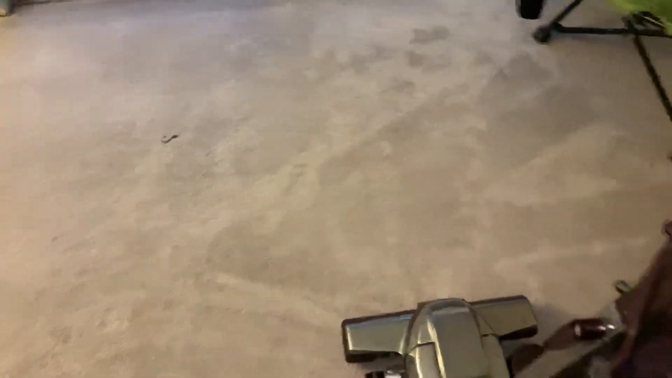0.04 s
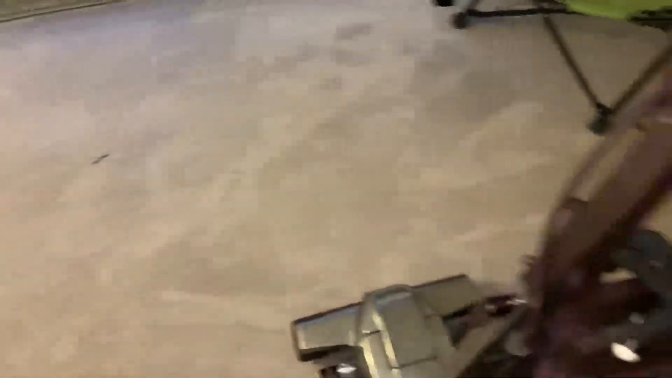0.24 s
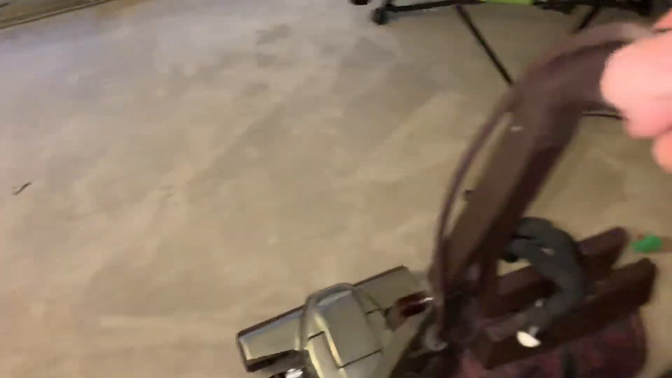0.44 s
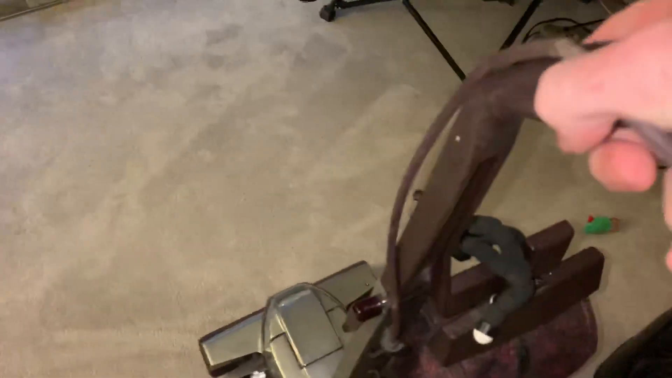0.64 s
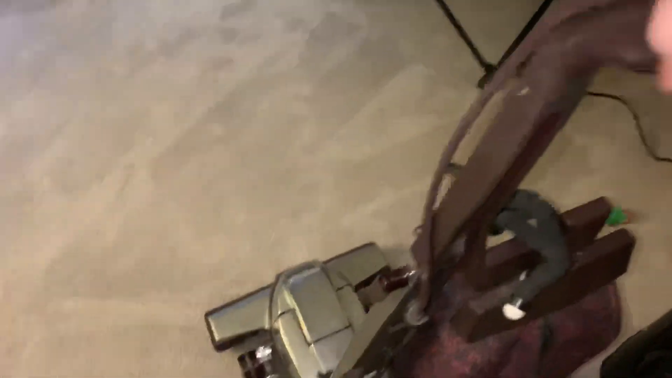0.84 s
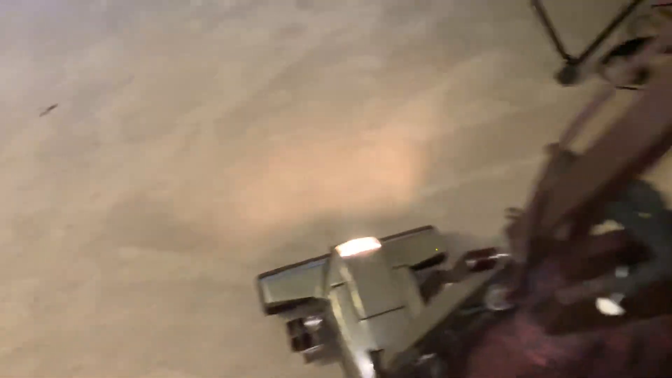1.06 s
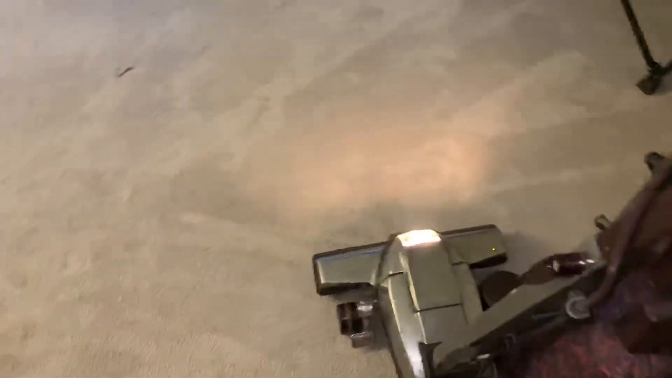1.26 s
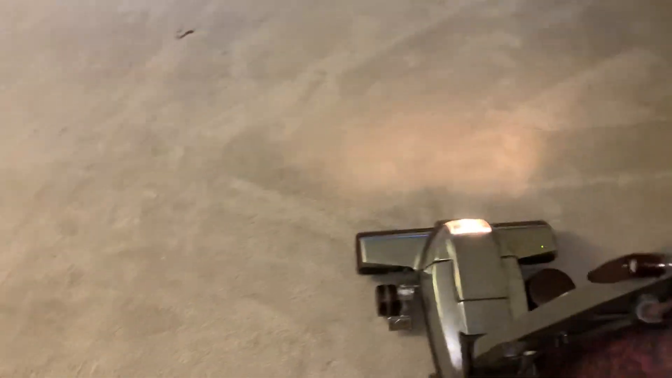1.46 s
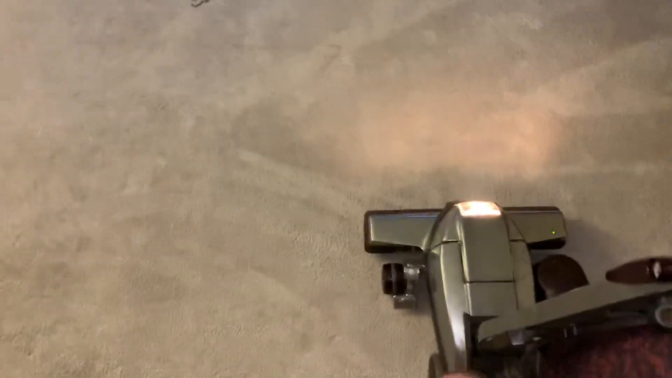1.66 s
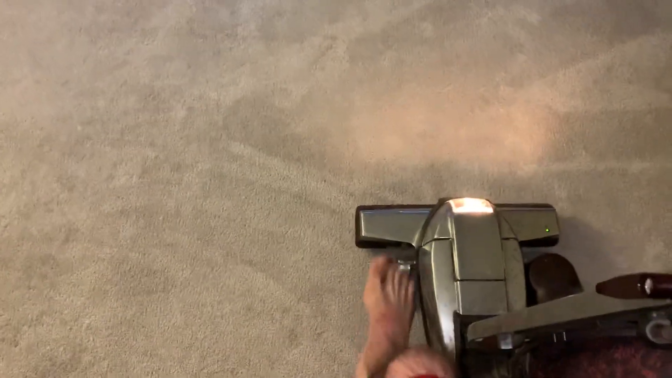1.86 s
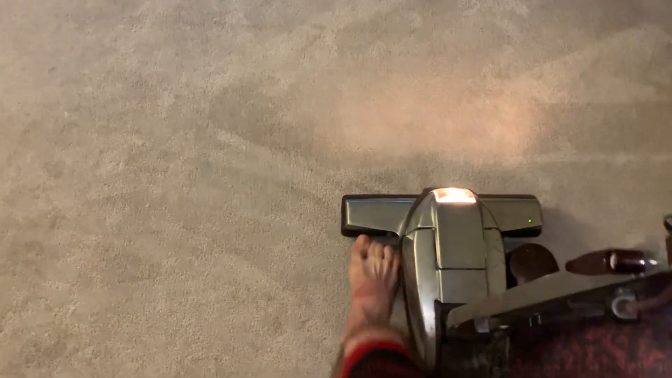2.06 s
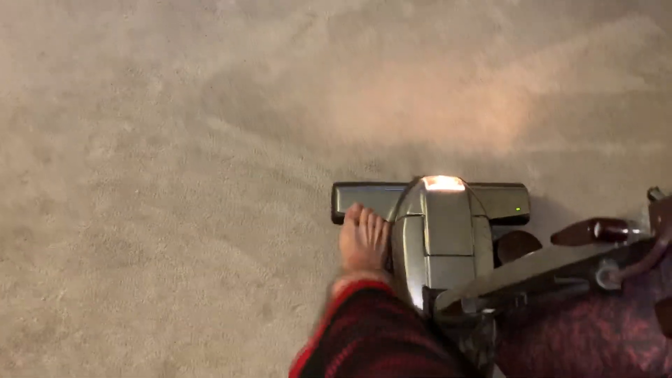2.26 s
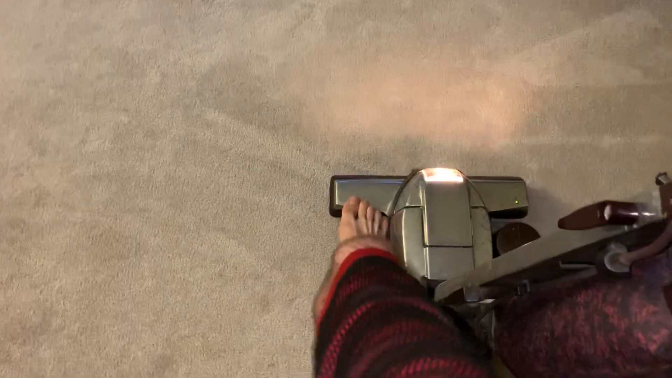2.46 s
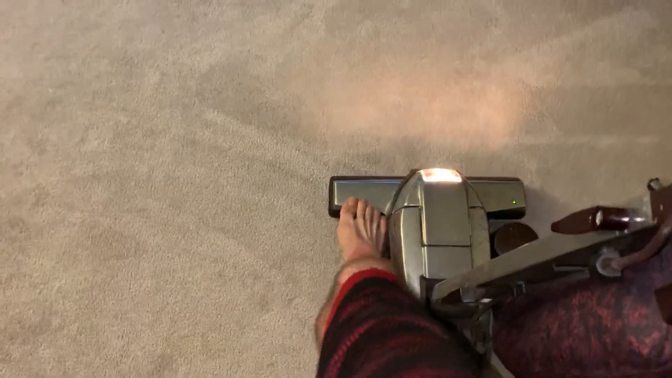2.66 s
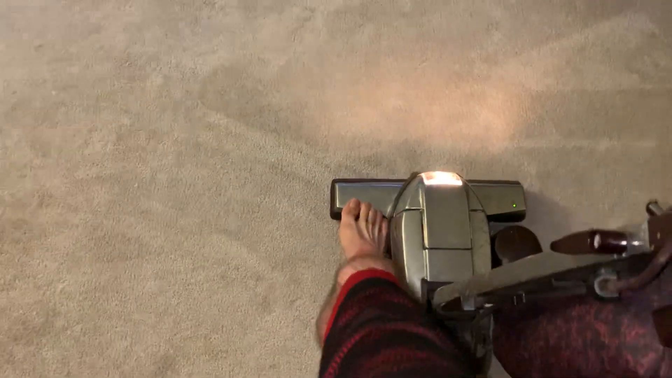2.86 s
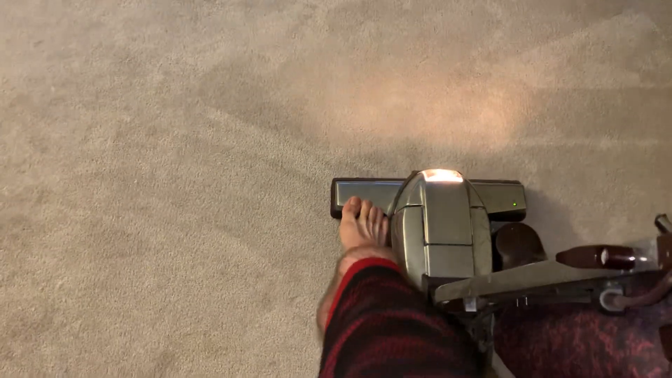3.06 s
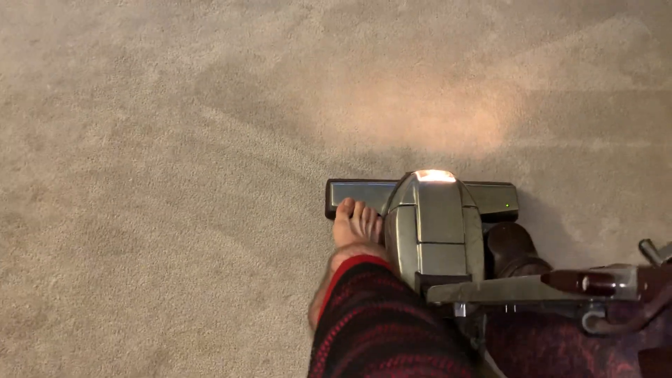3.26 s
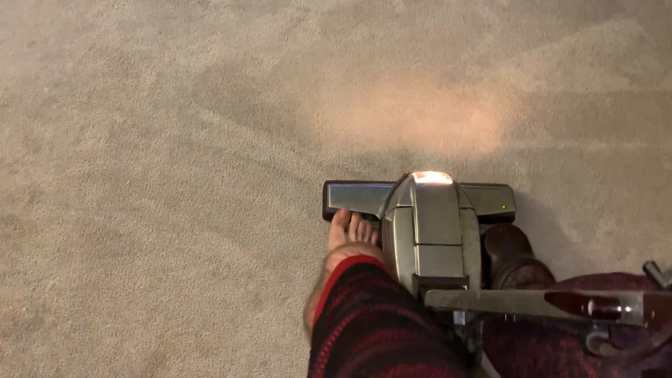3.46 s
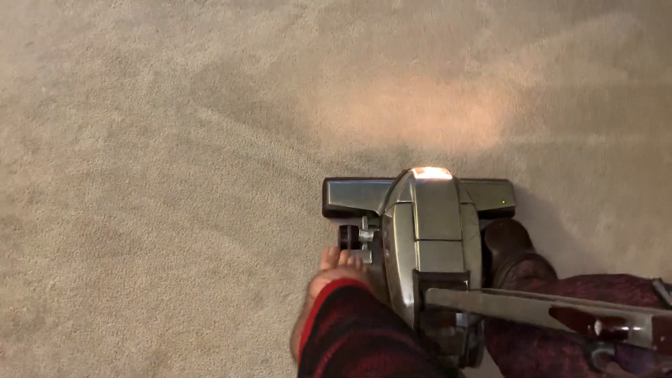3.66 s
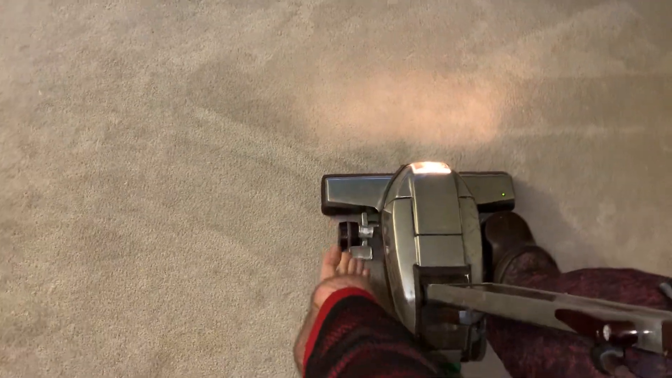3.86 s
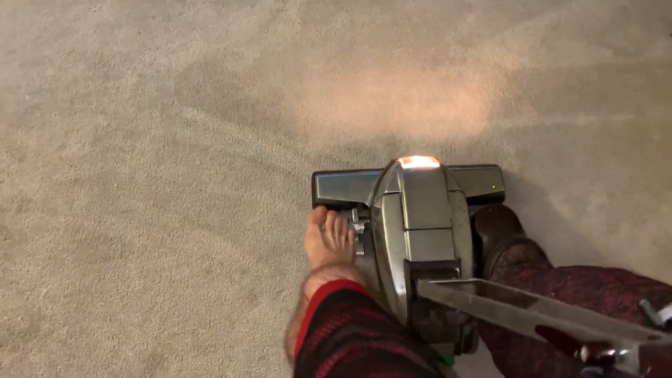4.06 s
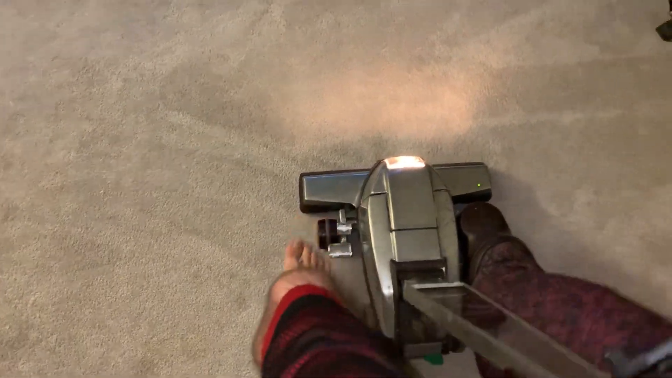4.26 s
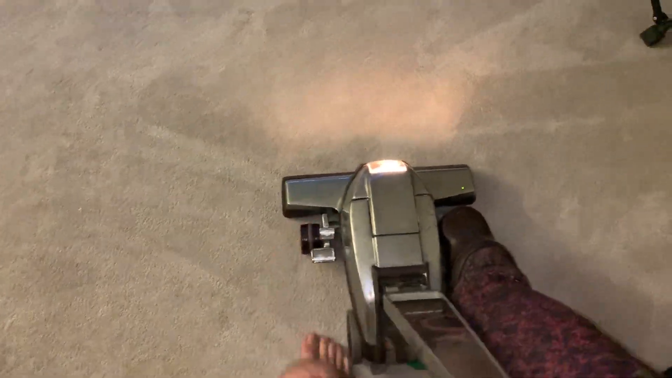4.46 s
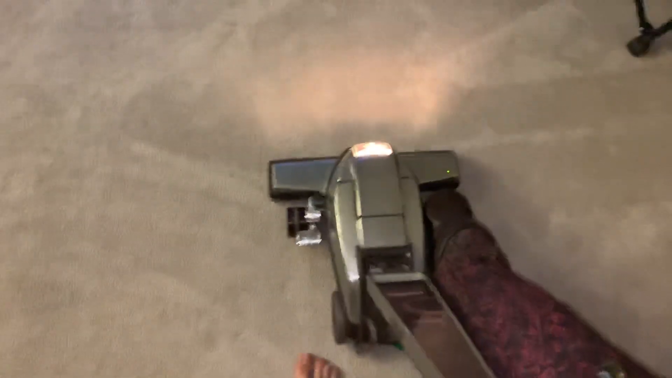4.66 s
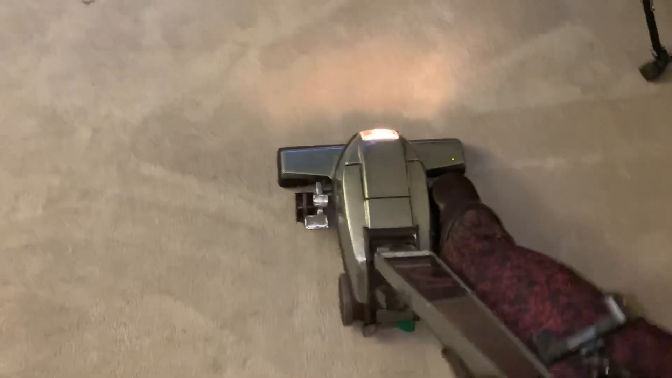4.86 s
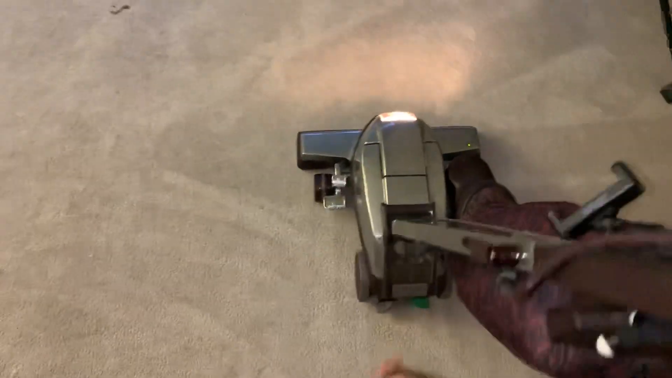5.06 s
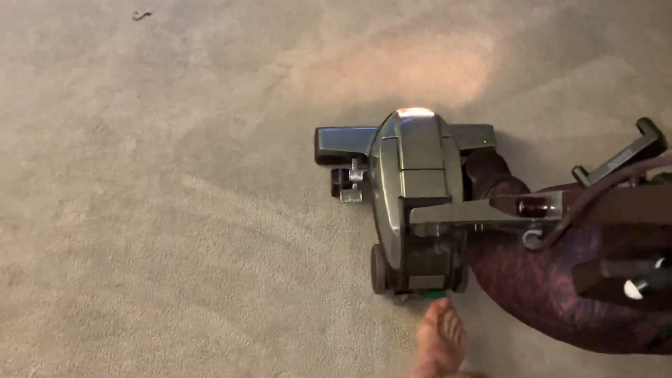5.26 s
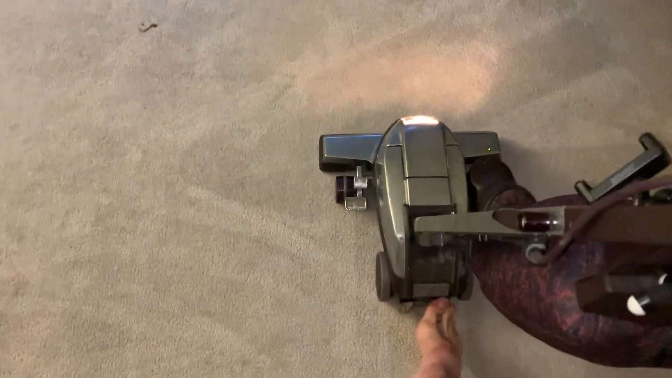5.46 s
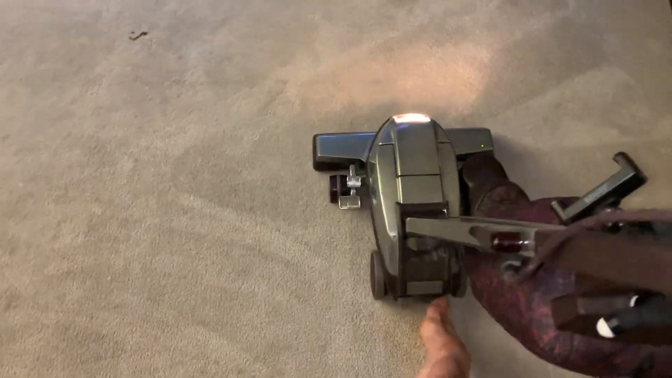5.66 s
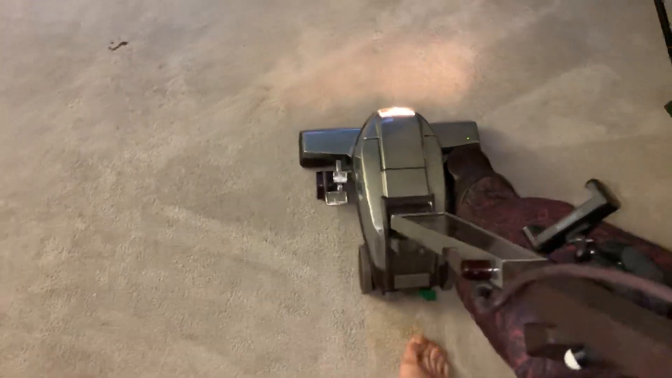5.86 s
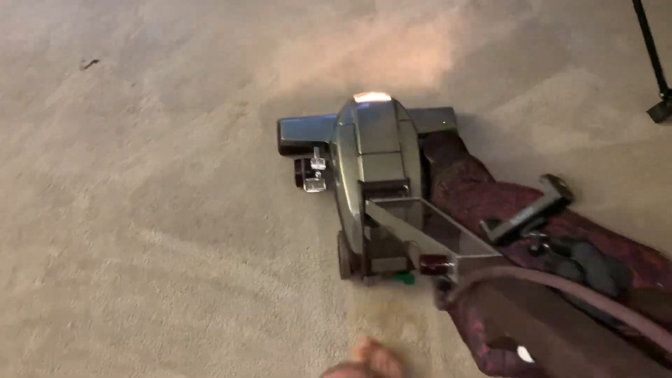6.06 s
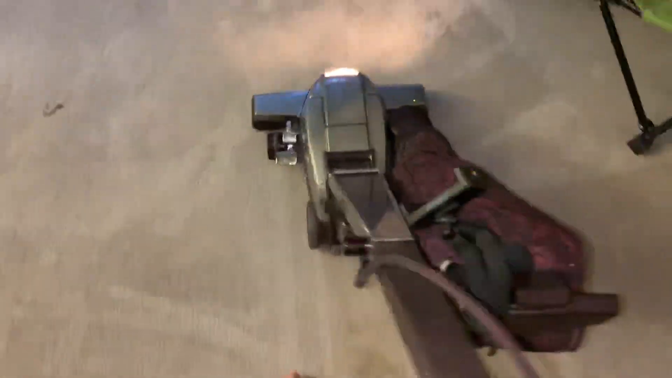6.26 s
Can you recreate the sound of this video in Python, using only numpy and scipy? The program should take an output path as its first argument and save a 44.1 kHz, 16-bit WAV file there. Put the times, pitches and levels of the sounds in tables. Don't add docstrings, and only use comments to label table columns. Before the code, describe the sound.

In a quiet carpeted room, dull footsteps and a faint handle creak precede a switch click. An upright vacuum's motor spins up quickly into a steady roar with high whine and airy hiss. A foot pedal then ratchets in hard metallic cracks, the head sinks, and the roar turns quieter and muffled with a buzzing brush beat. One last clack releases it and the roar opens again. Close handheld phone, stereo.

```python
import sys
import numpy as np
from scipy import signal
from scipy.fft import rfft, irfft, next_fast_len
from scipy.io import wavfile
from scipy.ndimage import uniform_filter1d

SR = 44100
rng = np.random.default_rng(int(sys.argv[2]) if len(sys.argv) > 2 else 0)


def linear_from_db(decibels):
    return 10 ** (np.asarray(decibels, float) / 20)


def wav_out(sig):
    wavfile.write(sys.argv[1], SR, np.round(np.clip(np.atleast_2d(sig).T, -1, 1) * 32767).astype(np.int16))


N = 278271

# (time [s], speed [turns/s])
SHAFT_SPEED = [(.94, 58), (1.04, 81), (1.1, 102), (1.23, 151.3), (1.34, 179.5), (1.43, 190.1),
               (1.57, 202.3), (1.8, 209.3), (2.14, 213.5), (3.28, 215.6), (3.55, 213.6), (4.2, 213.1),
               (4.36, 212), (5.38, 211.6), (5.58, 212.6), (5.95, 212.5), (6.05, 211.1), (6.31, 210)]
FULL_SPEED_HZ = 214
SWITCH_S = .9385
BELT_RATIO = .2928


def unit(x):
    return x / np.sqrt(np.mean(x ** 2))


def columns(table):
    s, *rest = np.transpose(table)
    return [np.interp(np.arange(N) / SR, s, c) for c in rest]


def colour(x, points):
    hz, db = np.transpose(points)
    log_f = np.log(np.arange(N // 2 + 1) * SR / N + 1)
    gain = linear_from_db(np.interp(log_f, np.log(hz), db, -90, -90))
    return unit(irfft(rfft(x) * gain, N))


def resonate(x, modes, floor_hz=200):
    f = np.arange(N // 2 + 1) * SR / N + 1
    gain = 0
    for k, (hz, width, db) in enumerate(modes):
        gain = gain + (-1) ** k * linear_from_db(db) / (1 + 1j * (f * f - hz * hz) / (f * width))
    return irfft(rfft(x) * gain / (1 + (floor_hz / f) ** 6), N)


def walk(rate):
    k = int(SR / rate)
    held = np.repeat(rng.standard_normal(N // k + 1), k)
    return 1.14 * uniform_filter1d(uniform_filter1d(held, k), k)[:N]


def swell(s, length):
    return np.exp(-((np.arange(N) / SR - s) / length) ** 2)


def ring(hz, t60, length=.3):
    t = np.arange(int(length * SR)) / SR
    return np.sin(2 * np.pi * hz * t) * np.exp(-np.log(1000) * t / t60)


def add(out, s, x):
    i = int(s * SR)
    out[i:i + len(x)] += x[:N - i]


def speed_db():
    return 20 * np.log10(columns(SHAFT_SPEED)[0] / FULL_SPEED_HZ)


def quiet_room():
    # (frequency [Hz], level per Hz [dB])
    hush = [(12, -32), (20, -6), (51, -11), (156, -14.5), (337, -14.5), (615, -30.5), (1060, -31.5),
            (1650, -45), (6000, -54), (8400, -56), (8620, -47), (8850, -58), (9540, -62), (12000, -53),
            (14500, -51), (15600, -70)]
    return linear_from_db(-56) * colour(rng.standard_normal(N), hush)


def handling():
    # (time [s], level [dB], frequency [Hz], t60 [s])
    steps = [
        (0.064, -33.5, 113, 0.19),
        (.07, -41, 210, 0.11),
        (.152, -61, 1100, .09),
        (.185, -42, 90, 0.072),
        (0.68, -61.5, 1200, 0.13),
        (.70, -44, 200, .06),
        (0.749, -29, 85, 0.059),
        (.81, -46, 180, 0.096),
    ]
    # (level [dB], frequency [Hz], t60 [s])
    switch = (-29.5, 920, 0.81)
    out, t = np.zeros(N), np.arange(int(.3 * SR)) / SR
    for s, db, hz, t60 in steps + [(SWITCH_S, *switch)]:
        if hz > 500:
            band = signal.butter(2, [.5 * hz, 1.7 * hz], "band", fs=SR)
            rattle = signal.lfilter(*band, rng.standard_normal(len(t)))
            rattle = 3 * rattle * np.exp(-np.log(1000) * t / t60)
            knock = np.minimum(t / 0.0032, 1) * rattle
        else:
            knock = np.minimum(t / 0.009, 1) * ring(hz, t60)
        add(out, s, linear_from_db(db) * knock)
    click = rng.standard_normal(len(t)) * np.minimum(t / 0.0036, 1) * np.exp(-t / 0.01)
    add(out, SWITCH_S, linear_from_db(-36.5) * click)
    return out


def air(shaft_turns, buffet):
    # (time [s], seal [0-1])
    head = [
        (0, 0.1),
        (3.15, 0.11),
        (3.35, 1),
        (5.45, 0.84),
        (5.65, 0.43),
        (6.1, 0.49),
        (6.31, 0.86),
    ]
    # (time [s], nearness [dB])
    bag_near = [(1.2, 0.4), (1.8, -0.5), (2.1, 0.5), (2.3, -2), (3.3, -0.8), (4.15, 0.5), (4.6, 3),
                (5.3, 1.5), (5.7, 1), (6.1, 4.5), (6.31, 3)]
    # (frequency [Hz], width [Hz], level [dB])
    open_nozzle = [(313.3, 21, 2.5), (375.7, 35.7, 2.5), (429.7, 23, -1), (495, 31, 0), (570.7, 23.5, 1),
                   (677, 51, -3.5), (807, 39, -6), (925, 37, -12), (1086, 38, -10), (1220, 180, -20),
                   (1578, 78, -22.5), (2230, 86, -28), (2450, 53, -33)]
    sealed_nozzle = [(279, 19.5, 0), (359.6, 21, 3), (424.6, 38, 2.5), (513, 34, 2), (584, 35, 0),
                     (726, 126, -7.5), (797, 25, 1.5), (927, 107, -11), (1200, 90, -9), (1589, 64, -10),
                     (1990, 94, -14.5), (2180, 48, -12), (2560, 41, -15.5)]
    # (frequency [Hz], width [Hz], level [dB])
    slot = [(432.2, 18, -1)]
    # (frequency [Hz], width [Hz], level [dB])
    surge = [(311, 34, -2), (376, 47, -3)]
    # (frequency [Hz], level per Hz [dB])
    rumble_line = [(20, -42), (60, -29), (95, -28.5), (122, -8), (150, -7), (180, -3), (215, -2.5),
                   (260, -8), (300, -3), (400, -26)]
    bag_line = [(500, -16), (900, 1), (1400, -1.5), (2300, 2.5), (3000, -2.5), (4600, -3.5), (6000, -14),
                (7000, -65)]
    top_line = [(4500, -15), (6000, -2.5), (7200, 3), (8000, -1), (11000, -4), (13000, -5.5), (14300, -14),
                (14550, -19), (15300, -21), (15750, -32), (15900, -60)]

    seal = np.clip(columns(head)[0], 0, 1)
    since = np.maximum(np.arange(N) / SR - SWITCH_S, 0)
    near_db = columns(bag_near)[0]
    roar_db = -13 + 2.24 * speed_db() - 7.5 * seal
    rumble_db = -24 + 1.2 * speed_db() - 5 * seal
    bag_db = -26.5 - 29.5 * np.exp(-since / 0.088) - 2.5 * seal + 0.73 * near_db
    top_db = -34 - 38 * np.exp(-since / 0.08) + near_db

    eddies = buffet * rng.standard_normal(N)
    chop = 1 + 0.11 * seal * np.cos(4 * np.pi * BELT_RATIO * shaft_turns)
    roar = np.sqrt(1 - seal) * unit(resonate(eddies, open_nozzle))
    roar = roar + np.sqrt(seal) * unit(resonate(chop * eddies[::-1], sealed_nozzle))
    half_open = 4 * seal * (1 - seal)
    roar = roar + 0.57 * half_open * unit(resonate(rng.standard_normal(N), slot))
    slow = np.clip(speed_db() / -2, 0, 1)
    roar = roar + slow * unit(resonate(np.roll(eddies, N // 2), surge))
    rumble = colour(rng.standard_normal(N), rumble_line) * linear_from_db(walk(20))
    bag = colour(linear_from_db(2.7 * walk(300)) * rng.standard_normal(N), bag_line) * linear_from_db(walk(13))
    top = colour(rng.standard_normal(N), top_line) * linear_from_db(.5 * walk(14))
    return linear_from_db(roar_db) * roar + linear_from_db(rumble_db) * rumble + linear_from_db(bag_db) * bag + linear_from_db(top_db) * top


def motor(shaft_turns):
    # (multiple of the shaft speed, level [dB])
    fan_lines = [(11, 0), (12, -8), (13, -10), (40, -16), (42, -15), (44, -11), (47, -9), (48, -17),
                 (49, -17), (51, -13)]
    commutator_lines = [(22, 0), (23, -15), (24, -13), (25, -16)]
    bearing_lines = [(66, 0), (65, -9)]
    # (frequency [Hz], width [Hz], boost [dB])
    housing = [(1400, 200, 26), (1800, 100, 28), (2080, 140, 24), (2900, 130, 13), (3450, 150, 11),
               (3900, 110, 7), (4350, 200, 3), (13750, 330, 13)]
    fan_housing = [(720, 120, 33)]
    # (time [s], length [s], fan [dB], commutator [dB])
    sways = [(1.22, .1, -8, 0), (1.39, .05, 4, -4), (1.51, .06, 0, 5), (1.67, .06, 0, 4),
             (1.86, .13, -2, 6), (3.0, .2, -6, 0), (4.8, .45, -5, 0), (2.0, .05, -8, 1), (2.3, .08, 2, -5),
             (2.62, .13, 9, 0), (2.2, .1, 2, 0), (2.8, .5, 0, -5), (3.22, .08, -8, -2), (3.12, .06, -3, 0),
             (3.4, .05, 1, 3), (3.5, .05, 0, -3), (3.75, .09, 0, -6), (4.04, .1, -1, 6),
             (4.23, .08, -7, -1), (4.36, .1, 0, 4), (4.5, .04, -5, 0), (4.61, .09, 0, 9),
             (4.95, .09, -4, 7), (5.2, .05, 3, -1), (5.45, .1, 3, 7), (5.6, .03, 1, -5), (5.8, .15, 0, 1),
             (5.9, .06, 4, -3), (6.1, .04, -3, 5), (6.22, .05, -3, -8), (6.29, .03, 0, 5)]
    # (time [s], length [s], lower line [dB], upper line [dB])
    side_lines = [(1.8, .08, -45, -60), (2.15, .08, -55, -50), (2.4, .1, -48, -60), (2.68, .1, -58, -44),
                  (2.85, .1, -58, -46), (3.45, .1, -48, -60), (3.58, .07, -46, -46), (3.9, .17, -48, -58),
                  (4.28, .04, -58, -45), (4.62, .13, -58, -45), (4.8, .05, -44, -56), (5.15, .12, -58, -47),
                  (5.82, .1, -44, -50), (6.05, .06, -52, -48)]
    # (time [s], length [s], level [dB])
    bearing_shade = [
        (2.5, .5, 5),
        (3.2, .25, 4),
        (5.75, .2, 3),
        (3.95, .33, -12),
        (4.8, .1, -6),
        (5.2, .3, -3),
        (6.25, .1, -14),
    ]
    # (time [s], length [s], level [dB])
    nozzle_song = [(1.25, .06, -37), (1.9, .15, -41), (2.35, .1, -33), (2.56, .12, -32), (2.8, .1, -38),
                   (3.06, .09, -31), (4.05, .25, -43), (4.9, .1, -42), (5.55, .1, -40), (6.0, .15, -42)]

    t, shaft_hz = np.arange(N) / SR, columns(SHAFT_SPEED)[0]
    mains = 2 * np.pi * 120 * t
    turns = shaft_turns + .0012 * np.sin(mains)
    fan_sway_db, commutator_sway_db = sum(np.outer(db, swell(s, length)) for s, length, *db in sways)
    shade_db = sum(db * swell(s, length) for s, length, db in bearing_shade)

    def housing_db(lines, modes):
        line_hz = lines[0][0] * shaft_hz
        return sum(db * np.exp(-((line_hz - hz) / width) ** 2) for hz, width, db in modes)

    def whine(lines, level_db):
        total = 0
        for k, rel_db in lines:
            flutter = linear_from_db(rel_db + 1.2 * walk(16))
            total = total + flutter * np.sin(2 * np.pi * k * turns + .5 * walk(50))
        return linear_from_db(level_db + 3) * total

    fan_db = -39.5 + 3 * speed_db() + fan_sway_db + housing_db(fan_lines, fan_housing)
    commutator_db = -43.5 + 2.1 * speed_db() + commutator_sway_db + housing_db(commutator_lines, housing)
    bearing_db = -59 + 2.5 * speed_db() + shade_db + housing_db(bearing_lines, housing)
    fan = whine(fan_lines, fan_db)
    commutator = (1 + .25 * np.cos(mains)) * whine(commutator_lines, commutator_db)
    bearing = (1 + .35 * np.cos(mains)) * whine(bearing_lines, bearing_db)

    song = sum(linear_from_db(db + 1) * swell(s, length) for s, length, db in nozzle_song)
    song = song * np.sin(2 * np.pi * 5 * shaft_turns + .6 * walk(40))
    lower, upper = sum(np.outer(linear_from_db(db), swell(s, length)) for s, length, *db in side_lines)
    bars = 2 * np.pi * commutator_lines[0][0] * shaft_turns + .4 * walk(40)
    sides = np.sqrt(2) * (lower * np.sin(bars - mains) + upper * np.sin(bars + mains))
    return song + fan + commutator + sides + bearing


def brush(shaft_turns):
    # (multiple of the roll speed, level [dB])
    bristles = [(1, -27), (2, 0), (4, -5), (5, -8), (6, -4), (8, -8), (10, -12)]
    # (time [s], length [s], level [dB])
    presses = [(3.29, .35, -29.5), (3.64, .81, -27.5), (4.45, .41, -33.5), (4.86, .14, -28), (5.0, .1, -34),
               (5.1, .2, -27.5), (5.3, .21, -31), (5.59, .07, -34), (5.89, .06, -29), (6.04, .07, -31),
               (6.26, .1, -36)]
    t = np.arange(N) / SR
    beat = 0
    for k, db in bristles:
        wave = np.cos(2 * np.pi * k * BELT_RATIO * shaft_turns + .5 * k * k)
        beat = beat + linear_from_db(db + 0.44 * walk(9)) * wave
    grip = (columns(SHAFT_SPEED)[0] / FULL_SPEED_HZ) ** 8
    free = linear_from_db(-42.5) * (t < presses[0][0])
    pressed = sum(linear_from_db(db) * (t >= s) * (t < s + length) for s, length, db in presses)
    level = uniform_filter1d(free + pressed, int(.04 * SR))
    return linear_from_db(4.5) * grip * level * beat


def ratchet():
    # (time [s], peak [dB], floor thump [dB], lever frequency [Hz], lever ring [dB])
    teeth = [
        (2.374, -9.5, -32, 4600, -21),
        (2.4788, -11, -41, 4520, -21),
        (2.589, -11.5, -35, 2350, -33),
        (2.982, -15, -45, 5000, -24.5),
        (3.0227, -12, -37, 4490, -21),
        (3.1038, -14, -39, 2420, -27),
        (3.1848, -22, -35, 2080, -35),
        (3.269, -14.5, -40, 4970, -27),
        (5.5902, -17, -39, 2560, -30),
    ]
    # (time [s], frequency [Hz], level [dB], t60 [s])
    pings = [(2.3755, 4990, -21, .04), (2.3755, 4210, -22, .04), (2.381, 8000, -24, .02),
             (2.388, 5500, -25, .02), (2.479, 4970, -22, .03), (2.479, 8500, -23, .02),
             (2.5895, 8300, -24, .02), (2.983, 5160, -24, .05), (3.0235, 4970, -20, .05),
             (3.0235, 2300, -22, .03), (3.1045, 2300, -23, .03), (3.111, 4300, -22, .015),
             (3.186, 8200, -30, .02), (3.2695, 4800, -20, .025), (3.2695, 2200, -25, .02),
             (2.9835, 4100, -26, .03), (3.1045, 3900, -26, .03), (3.277, 8000, -29, .02),
             (5.591, 7500, -23, .025)]
    # (time [s], length [s], level [dB])
    scrapes = [
        (2.368, .004, -25),
        (3.017, .005, -24),
        (3.265, .004, -30),
        (5.588, .004, -16),
        (2.39, .008, -26),
        (2.995, .007, -28),
        (3.116, .006, -25),
    ]
    # (frequency [Hz], width [Hz], level [dB])
    pawl = [(1200, 410, -1), (2410, 110, 6.5), (2900, 1200, -6), (4430, 330, -2), (4950, 200, -2),
            (6350, 1400, -4), (8900, 1900, -0.5), (11600, 7300, -2.5), (13800, 720, -8)]
    cracks, rings, t = np.zeros(N), np.zeros(N), np.arange(int(.3 * SR)) / SR
    rebound_s = 0.0097
    for s, peak_db, thump_db, lever_hz, lever_db in teeth:
        burst = np.minimum(t / 0.004, 1) ** 2 * (5.5 * np.exp(-t / 0.0027) + 0.15 * np.exp(-t / .02))
        burst += 0.3 * (t > rebound_s) * np.exp(-np.abs(t - rebound_s) / 0.014)
        add(cracks, s - .002, linear_from_db(peak_db) * burst * rng.standard_normal(len(t)))
        lever = ring(lever_hz, 0.11) + 0.75 * ring(0.98 * lever_hz, 0.07)
        add(rings, s, linear_from_db(lever_db) * lever)
        detune = 2 ** (0.17 * rng.standard_normal(3))
        boards = sum(ring(hz * d, 0.66) for hz, d in zip((30, 58, 80), detune))
        add(rings, s, linear_from_db(thump_db) * (ring(12, 0.29) + 0.8 * boards))
    for s, ping_hz, ping_db, t60 in pings:
        add(rings, s, linear_from_db(ping_db) * np.minimum(t / .0008, 1) * ring(ping_hz, t60))
    for s, length, scrape_db in scrapes:
        scrape = np.exp(-((t - .02) / length) ** 2) * rng.standard_normal(len(t))
        add(cracks, s - .02, linear_from_db(scrape_db) * scrape)
    return linear_from_db(3.5) * resonate(cracks, pawl) + linear_from_db(-10.0) * cracks + rings


def walls(x):
    t = np.arange(int(.3 * SR)) / SR
    tail = rng.standard_normal(len(t)) * np.exp(-np.log(1000) * t / 0.13)
    return signal.fftconvolve(x, tail / np.sqrt(np.sum(tail ** 2)))[:N]


def combed(x):
    share = .6
    turn = 2 * np.pi * .55 * np.arange(N) / SR
    high = signal.sosfiltfilt(signal.butter(2, 900, "high", fs=SR, output="sos"), x)
    echoes = np.cos(turn) * walls(high) + np.sin(turn) * walls(high)
    return x - high + np.sqrt(1 - share) * high + np.sqrt(share) * echoes


def ports(near, other):
    # (frequency [Hz], likeness [0-1], left minus right [dB], phase of right [rad])
    port_lines = [(30, .96, -.5, 0), (350, .96, -.5, .2), (620, .92, -3, .3), (850, .7, -5.5, .6),
                  (1400, .52, -2.5, 1.7), (2800, .45, -1.5, 1.8), (4600, .35, 3, 4), (6200, .3, 1, 2.8),
                  (7000, .8, 0, 1.2), (7850, .95, 0, 0), (9250, .975, 0, -2.75), (9800, .975, 0, -3.6),
                  (11350, .96, 0, -6.28), (13100, .98, 0, -9.42), (14800, .98, 0, -12.57)]
    size = next_fast_len(N + SR // 2)
    f = np.arange(size // 2 + 1) * SR / size
    hz, *rest = np.transpose(port_lines)
    like, pan_db, phase = (np.interp(f, hz, c) for c in rest)
    left = rfft(near, size)
    right = like * left * np.exp(1j * phase) + np.sqrt(1 - like ** 2) * rfft(other, size)
    return irfft(np.array([left * linear_from_db(pan_db / 2), right * linear_from_db(-pan_db / 2)]), size)[:, :N]


def scene():
    shaft_turns = np.cumsum(columns(SHAFT_SPEED)[0]) / SR
    running = np.clip((np.arange(N) / SR - SWITCH_S) / .004, 0, 1)
    buffet = linear_from_db(1.22 * walk(60) + walk(7.66))
    solid = handling() + running * (motor(shaft_turns) + brush(shaft_turns)) + ratchet()
    left_air, right_air = [quiet_room() + combed(running * air(shaft_turns, buffet)) for _ in range(2)]
    near = left_air + solid + linear_from_db(-14.5) * walls(solid)
    other = right_air + .8 * solid + .6 * walls(solid)
    return ports(near, other)


def top_cut(x):
    return signal.sosfilt(signal.butter(12, 16690, fs=SR, output="sos"), x)


def record(dry):
    rounded = np.tanh(.8 * dry) / .8
    cut = signal.sosfilt(signal.ellip(8, .2, 60, 15900, fs=SR, output="sos"), rounded)
    return top_cut(cut)


dry = scene()
out = record(dry)
wav_out(out)
```